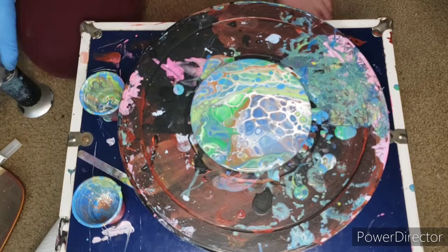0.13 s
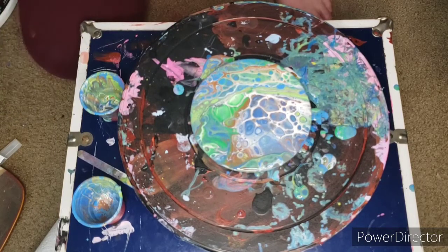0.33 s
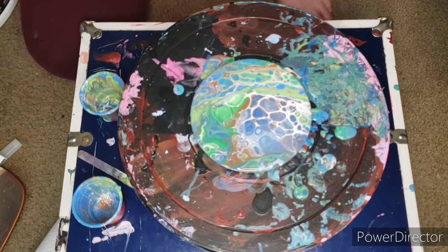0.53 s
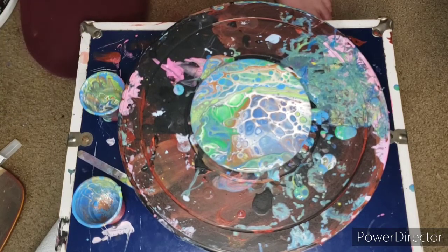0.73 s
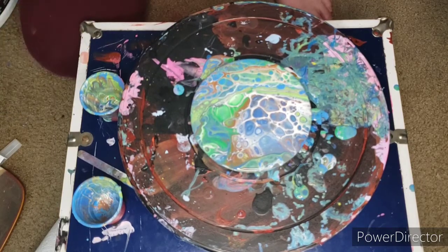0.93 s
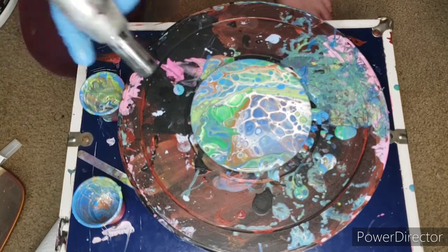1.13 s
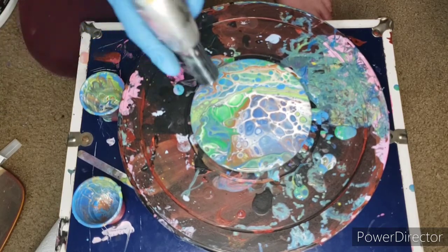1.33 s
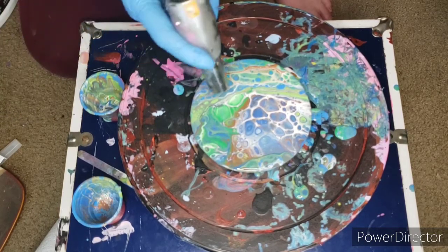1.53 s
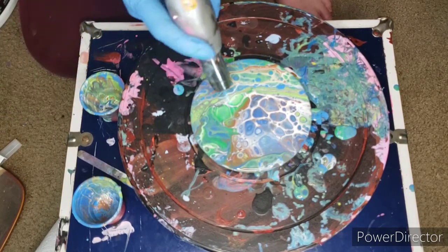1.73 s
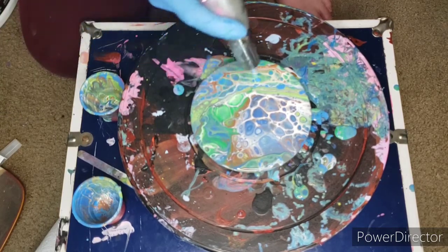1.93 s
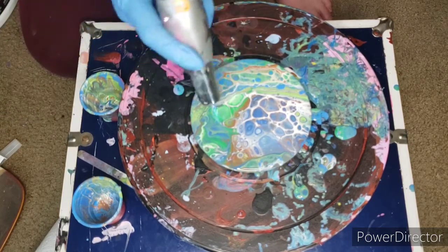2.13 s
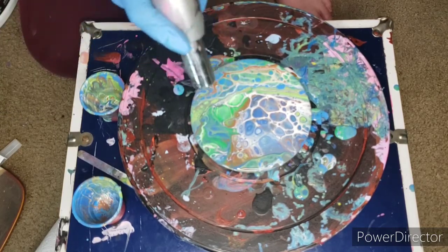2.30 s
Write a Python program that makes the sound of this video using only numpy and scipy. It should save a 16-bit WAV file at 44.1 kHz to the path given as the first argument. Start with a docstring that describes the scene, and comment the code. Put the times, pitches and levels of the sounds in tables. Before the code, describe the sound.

In a quiet, dry room, soft cloth swishes lead to small handling clicks, a gas hiss and a hard igniter crack; a quiet fluttering torch flame follows and stops with double release clicks, heard close in stereo.

```python
"""A quiet carpeted room, where a small gas torch is lit in a gloved hand.
Cloth swishes as the arm moves (strokes of coloured noise); the trigger ticks (cracks and ringing modes);
gas starts to hiss (steady noise), the igniter snaps (a grainy burst with rings and a low jolt), and a flame
roars for half a second (fluttering noise bands) and dies as the trigger is let go.
Low hum and rumble lie under it; of the two microphone ports the left has a bright resonance."""
import sys
import numpy as np
from scipy import signal
from scipy.fft import rfft, irfft
from scipy.io import wavfile

SR = 44100
rng = np.random.default_rng(int(sys.argv[2]) if len(sys.argv) > 2 else 0)


def volts(x):
    """Linear amplitude factor 10**(x/20) for a level x in dB, scalar or array-like."""
    e = np.asarray(x, float) / 20
    return 10 ** e


def to_wav(s):
    """Save 16-bit WAV."""
    ch = np.atleast_2d(s).T  # columns
    pcm = np.round(np.clip(ch, -1, 1) * 32767)  # PCM
    wavfile.write(sys.argv[1], SR, pcm.astype(np.int16))


N = 108574
T = np.arange(N) / SR
HZ = np.maximum(np.fft.rfftfreq(N, 1 / SR), 1)
SIDES = np.array([[1], [-1]])  # left, right

# How alike the ports hear near and far sounds: (likeness in the bass [0..1], frequency where it halves [Hz])
NEAR_LIKENESS = (1, 1800)
FAR_LIKENESS = (.9, 450)
# The room's answer to a blow: decay and build-up time
ROOM_T60_S, ROOM_BUILD_S = 0.17, 0.0093


def rms_one(x):
    """Scale to rms 1."""
    return x / np.sqrt(np.mean(x ** 2) + 1e-20)


def in_time(rows, edge_s=0.017):
    """Table columns over time; beyond each end they slide to 40 below the end value within edge_s."""
    s, *columns = np.transpose(rows)
    s = np.r_[s[0] - edge_s, s, s[-1] + edge_s]
    return [np.interp(T, s, np.r_[c[0] - 40, c, c[-1] - 40]) for c in columns]


def at_hz(points):
    """A spectrum table on the frequency grid, interpolated over log frequency."""
    hz, value = np.transpose(points)
    return np.interp(np.log(HZ), np.log(hz), value)


def drift(rate_hz):
    """Random wandering of rms 1, mostly slower than rate_hz."""
    return rms_one(irfft(rfft(rng.standard_normal(N)) / (1 + (HZ / rate_hz) ** 2), N))


def noise(tone, likeness, grain=None):
    """Stereo noise coloured by tone and cut off beyond its ends; grain makes it lumpy; the mid has rms 1."""
    # Spread of the random sample-by-sample gain: {grain: spread [dB]}
    grain_spread = {"cloth": 3, "crack": 3, "gas": 2}
    lumps = volts(grain_spread.get(grain, 0) * rng.standard_normal(N))
    white = rng.standard_normal((2, N)) * lumps
    mid, side = rfft(white) * volts(at_hz(tone)) * (HZ > tone[0][0]) * (HZ < tone[-1][0])
    alike = np.clip(likeness[0], 0, 1) / (1 + (HZ / likeness[1]) ** 2)
    out = irfft(np.sqrt(1 + alike) * mid + np.sqrt(1 - alike) * side * SIDES, N)
    return out / np.std(out.mean(axis=0))


def dying(start_s, t60, rise_s=0.00036):
    """Quick rise, then exponential fall by 60 dB in t60 seconds."""
    age = np.maximum(T - start_s, 0)
    return (1 - np.exp(-age / rise_s)) * volts(np.maximum(-60 * age / t60, -200))


def stroke(peak_s, rise_s, fall_s):
    """Rounded swell with exponential flanks."""
    flank_s = np.where(T < peak_s, rise_s, fall_s)
    return 1 / np.cosh(np.clip(2 * (T - peak_s) / flank_s, -50, 50))


def rings(start_s, modes):
    """One blow sets every mode ringing, each with its own random strength per port."""
    out = 0
    for hz, db, t60 in modes:
        strength = volts(db + rng.normal(0, 2.4, (2, 1)))
        out = out + strength * dying(start_s, t60) * np.sin(2 * np.pi * hz * (T - start_s))
    return out


def band(x, hz, width_hz):
    """A broad resonance, at half amplitude half a width from its centre."""
    return irfft(rfft(x) / (1 + ((HZ - hz) / width_hz * 2) ** 2), N)


def gliding(rows, width_hz, column):
    """A band of noise whose centre follows a table column."""
    table = np.array(rows)
    centre_hz = np.interp(T, table[:, 0], table[:, column])
    phase = 2 * np.pi * np.cumsum(centre_hz) / SR
    return drift(width_hz) * np.cos(phase) + drift(width_hz) * np.sin(phase)


def flame():
    """Cold gas hisses from the nozzle; burning, it roars with shared flutter, patchy jet hiss and a whistle band."""
    # Unlit gas: (time [s], level [dB])
    gas = [(1.62, -70), (1.68, -55.5), (1.74, -54.5)]
    # Unlit gas colour: (frequency [Hz], relative level [dB])
    gas_tone = [(1500, -15), (3400, -22.5), (4200, -6.5), (5600, -6), (7600, -17.5), (9300, -21.5),
                (10800, -16.5), (14300, -15), (16000, -19)]
    # Burning flame: (time [s], roar level [dB], hiss level [dB], whistle band level [dB])
    burn = [(1.8, -53, -51.5, -84), (1.92, -52, -58.5, -61), (2.03, -50, -56, -55),
            (2.15, -53.5, -55, -64.5), (2.24, -53.5, -56.5, -83), (2.298, -55.5, -53, -89),
            (2.399, -91, -85, -97)]
    # Roar colour: (frequency [Hz], relative level [dB])
    roar_tone = [(76, -35.5), (130, -2.5), (220, -10.5), (400, -0.5), (526, -5.5), (620, -1), (700, -12),
                 (889, 2.5), (1150, -4.5), (1900, -39.5)]
    # Jet hiss colour: (frequency [Hz], relative level [dB])
    hiss_tone = [(900, -23), (1400, -8), (2900, -11), (4070, -16.5), (5060, -7), (6200, -13.5), (7270, -9),
                 (8950, -25.5), (10200, -17), (12200, -23), (13400, -15), (16000, -28.5)]
    catch_s = 1.745

    # From the catch on, the flame holds the levels of its first row
    roar_db, hiss_db, whistle_db = in_time([(catch_s, *burn[0][1:])] + list(burn))
    flutter = drift(23)
    roar = volts(roar_db + 1.2 * flutter) * noise(roar_tone, NEAR_LIKENESS, "gas")

    jet = noise(hiss_tone, NEAR_LIKENESS, "gas")
    # Every 1 kHz band wavers on its own
    patches = sum(volts(2.0 * drift(10)) * band(jet, hz, 1000) for hz in np.arange(1000, 17000, 1000))
    patches = patches * np.std(jet) / np.std(patches)
    hiss = volts(hiss_db + 0.69 * flutter) * patches
    whistle = volts(whistle_db + 0.63 * drift(20)) * rms_one(band(jet, hz=5150, width_hz=1000))

    cold_gas = volts(in_time(gas)[0] + 0.96 * drift(30)) * noise(gas_tone, NEAR_LIKENESS, "gas")
    return roar + hiss + whistle + cold_gas


def igniter():
    """The hammer strikes the crystal: a grainy crack, ringing parts, a body thump, the room and a low jolt."""
    # Crack of the strike: (time [s], level [dB], t60 [s])
    strike_s, crack_db, crack_t60 = (1.7406, -17.5, 0.024)
    # Crack colour: (frequency [Hz], relative level [dB])
    snap_tone = [(250, -9), (670, -22), (1300, -4.5), (2200, -6), (2700, -4.5), (7900, -5), (8550, -7),
                 (9300, -7), (12200, -1.5), (15400, -0.5), (16900, -39.5)]
    # Ringing parts: (frequency [Hz], level [dB], t60 [s])
    snap_rings = [(1587, -27, 0.04), (2657, -40, 0.17), (3620, -31, 0.12)]
    # Body thump, nearly alike in both ports: (time [s], [(frequency [Hz], level [dB], t60 [s])])
    thump = (1.745, [(52.8, -32.5, 0.14)])
    # Low jolt, a quick swing then a slow one back: (time [s], frequency [Hz], left level [dB], right level [dB])
    jolt = [(1.7403, 165, -30, -26), (1.7433, 57, -25, -22)]
    room_db, jolt_t60_cycles = -21.5, 4.5

    crack = noise(snap_tone, NEAR_LIKENESS, "crack") * volts(crack_db) * dying(strike_s, crack_t60)
    tail = noise(snap_tone, FAR_LIKENESS, "gas") * volts(room_db) * dying(strike_s, ROOM_T60_S, ROOM_BUILD_S)
    out = crack + rings(strike_s, snap_rings) + tail - rings(*thump)
    for k, (s, hz, left_db, right_db) in enumerate(jolt):
        wave = np.sin(2 * np.pi * hz * (T - s)) * dying(s, jolt_t60_cycles / hz)
        # Opposite sign in the two ports, and turned over for the swing back
        out = out + (-1) ** k * SIDES * volts(np.array([[left_db], [right_db]])) * wave
    return out


def trigger():
    """Ticks: a short crack, the body's modes and a room tail; the slide rubs unevenly on the body and squeaks."""
    # Trigger and handling ticks: (time [s], level [dB], body ring relative to it [dB])
    ticks = [(0.54, -58.5, -15), (1.1558, -41.5, -8), (1.187, -52.5, 4.5), (1.56, -56, -12),
             (1.574, -47.5, -6), (2.260, -41, 16.5), (2.277, -43.5, 20.5)]
    # Modes of the torch body: (frequency [Hz], relative level [dB], t60 [s])
    body_modes = [(982, -18, 0.038), (1308, -10, 0.031), (1610, -8, 0.01), (2880, -16.5, 0.0091),
                  (3410, -13.5, 0.013), (4150, -20.5, 0.018)]
    # Tick colour: (frequency [Hz], relative level [dB])
    tick_tone = [(700, -18.5), (3000, -1.5), (4400, -1.5), (7000, 0), (9000, -9.5), (12000, -2.5),
                 (16500, -10.5)]
    # The trigger rubs in its slide: (time [s], level [dB], main resonance [Hz])
    slide = [(1.59, -65, 1350), (1.61, -80, 1350), (1.63, -61.5, 1380), (1.665, -65, 1330),
             (1.69, -74, 1550), (1.74, -61, 1680)]
    # The slide squeaks: (peak time [s], level [dB], rise [s], fall [s], frequency [Hz])
    squeaks = [(1.625, -59.5, 0.015, 0.016, 2950)]
    crack_t60_s, tick_room_db = 0.016, -13
    slide_width_hz, slide_body_db = 250, -2

    crack = noise(tick_tone, NEAR_LIKENESS, "crack")
    tail = noise(tick_tone, FAR_LIKENESS)
    out = 0
    for s, db, ring_db in ticks:
        tick = crack * dying(s, crack_t60_s)
        ring = volts(ring_db) * rings(s, body_modes)
        room = volts(tick_room_db) * tail * dying(s, ROOM_T60_S, ROOM_BUILD_S)
        out = out + volts(db) * (tick + ring + room)

    rub = noise([(300, 0), (8000, 0)], NEAR_LIKENESS, "crack")
    # The rub excites each body mode with its own wavering strength
    body = sum(volts(db + 3.0 * drift(15)) * band(rub, hz, slide_width_hz) for hz, db, t60 in body_modes)
    main = gliding(slide, slide_width_hz, column=2)
    rubbing = volts(in_time(slide)[0]) * (volts(slide_body_db) * rms_one(body) + main)
    squeak = sum(volts(db) * stroke(s, rise, fall) * rms_one(band(rub, hz, slide_width_hz))
                 for s, db, rise, fall, hz in squeaks)
    return out + rubbing + squeak


def swish():
    """Cloth slides on cloth: fine-grained strokes of varied colour and a gliding fold band; also two low puffs."""
    # Strokes of sleeve and glove:
    # (peak time [s], level [dB], rise [s], fall [s], lower band [dB], top band [dB]), bands relative to level
    strokes = [(.03, -67, 0.088, 0.28, -6, -0.5), (0.165, -61.5, 0.055, 0.12, -4, 3.5),
               (0.403, -64.5, 0.092, 0.1, 2, -0.5), (0.766, -57, 0.035, 0.13, -4, -7.5),
               (0.832, -54.5, 0.08, 0.035, 3.5, 1), (1.001, -60, 0.073, 0.083, 13, 11.5),
               (1.162, -60, 0.055, 0.05, 8, 9.5), (1.249, -67, 0.11, 0.067, 7.5, 5.5)]
    # Cloth colour: (frequency [Hz], relative level [dB])
    cloth_tone = [(900, -27), (1400, -28.5), (2000, -10), (4300, -6.5), (5600, 5.5), (7300, 3),
                  (8600, -8.5), (11500, -5), (16000, -7)]
    # Edges between the three bands: (lower edge [Hz], upper edge [Hz])
    split_hz = [4200, 8700]
    # A hollow band that glides as the folds move: (time [s], centre [Hz], level [dB])
    fold = [(.72, 3006, -75), (.77, 2610, -66), (.82, 1749, -67), (.89, 2149, -74.5), (.95, 2510, -78),
            (1.015, 3200, -57), (1.07, 2593, -75.5), (1.22, 2306, -63.5), (1.3, 2107, -81.5)]
    # Low puffs: a soft cloth brush, then the short low thud of the tick at 1.187 s:
    # (peak time [s], level [dB], rise [s], fall [s])
    puffs = [(0.399, -64.5, 0.054, 0.055), (1.189, -62.5, 0.0022, 0.011)]
    # Puff colour: (frequency [Hz], relative level [dB])
    puff_tone = [(120, 11), (220, 15), (500, -9), (1600, -20)]

    cloth = noise(cloth_tone, NEAR_LIKENESS, "cloth")
    low, mid, top = (signal.sosfilt(signal.butter(3, edge, kind, fs=SR, output="sos"), cloth)
                     for edge, kind in [(split_hz[0], "low"), (split_hz, "band"), (split_hz[1], "high")])
    power = 0  # overlapping strokes add in power, one row per band
    for s, db, rise, fall, low_db, top_db in strokes:
        band_gains = volts(db + np.array([low_db, 0, top_db]))
        power = power + np.outer(band_gains, stroke(s, rise, fall)) ** 2
    gains = np.sqrt(power) * [volts(1.3 * drift(40)) for layer in power]
    rustle = gains[0] * low + gains[1] * mid + gains[2] * top

    puff_level = sum(volts(db) * stroke(s, rise, fall) for s, db, rise, fall in puffs)
    low_puffs = puff_level * noise(puff_tone, NEAR_LIKENESS)
    folds = volts(in_time(fold)[1]) * gliding(fold, width_hz=590, column=1)
    return rustle + low_puffs + folds


def background():
    """Two hum lines, wavering in level and phase, in low rumble; and a faint hiss."""
    # Hum lines: (frequency [Hz], level [dB])
    hum_lines = [(85, -69.5), (116, -68)]
    # Gain on hum and rumble: (time [s], gain [dB])
    lows_gain = [(0, 2), (.25, 4.5), (.35, -2), (.6, 1.5), (.8, -8), (1.1, -4.5), (1.25, 1), (1.7, -1.5),
                 (1.8, 8), (2.0, -2), (2.46, 2)]
    # Rumble colour: (frequency [Hz], relative level [dB])
    rumble_tone = [(15, -29.5), (50, 2.5), (120, -5), (190, -20.5), (250, -18), (500, -33.5), (900, -44)]
    # Faint hiss colour: (frequency [Hz], relative level [dB])
    floor_tone = [(240, -36.5), (550, -16), (2100, -11.5), (5500, -22), (7200, -11.5), (8300, -19.5),
                  (16000, -17)]
    rumble_db, floor_db = -64.5, -82
    waver_hz, waver_db, waver_rad = 4.7, 3.5, 0.36

    hum = 0
    for hz, db in hum_lines:
        level = volts(db + waver_db * drift(waver_hz)) * np.sqrt(2)
        hum = hum + level * np.sin(2 * np.pi * hz * T + waver_rad * drift(waver_hz))
    rumble = volts(rumble_db) * noise(rumble_tone, FAR_LIKENESS)
    s, db = np.transpose(lows_gain)
    lows = volts(np.interp(T, s, db)) * (hum + rumble)
    return lows + volts(floor_db + 0.8 * drift(6)) * noise(floor_tone, FAR_LIKENESS)


def pan(db):
    """Port gains that make the left louder than the right by db."""
    return volts(db / 2 * SIDES)


def scene():
    """All sources, placed left to right; the cloth is nearer the left port and reaches the right one later."""
    cloth = swish() * pan(4.5)
    lead_s = 0.0003
    cloth = np.array([cloth[0], np.roll(cloth[1], int(lead_s * SR))])
    torch = (trigger() + flame()) * pan(1)
    return cloth + torch + igniter() * pan(-1.5) + background()


def band_limit(x):
    """A steep low-pass at the top of the band."""
    return signal.sosfilt(signal.butter(12, 16900, fs=SR, output="sos"), x)


def record(dry):
    """Each port has its own colour; above the cutoff both fall by 30 dB."""
    # Colour of the ports: (frequency [Hz], left minus right [dB])
    ports = [(60, 3), (300, 0), (2500, 3.5), (5000, 1.5), (7200, 13.5), (9000, -2), (15000, -0.5)]
    cutoff_hz, slope_hz = 15700, 80
    port_db = at_hz(ports) / 2 * SIDES
    top_cut_db = 30 / (1 + np.exp(np.clip((cutoff_hz - HZ) / slope_hz, -50, 50)))
    mix = irfft(rfft(dry) * volts(port_db - top_cut_db), N)
    return band_limit(mix)


dry = scene()
out = record(dry)
to_wav(out)
```